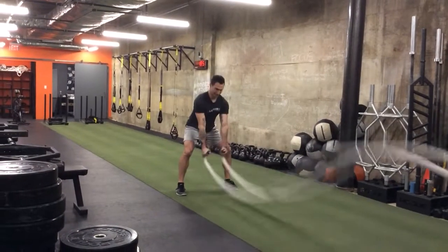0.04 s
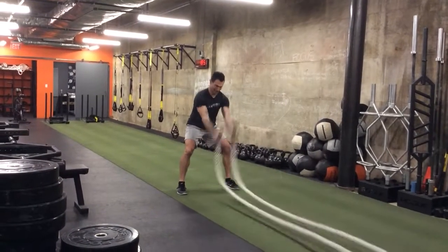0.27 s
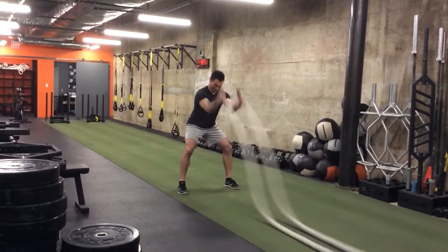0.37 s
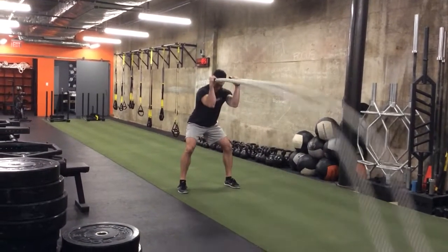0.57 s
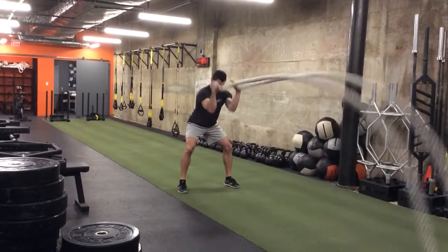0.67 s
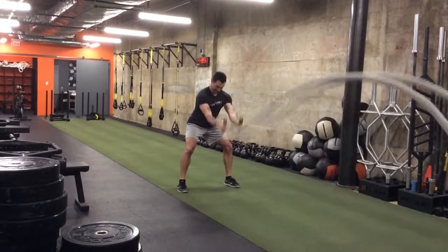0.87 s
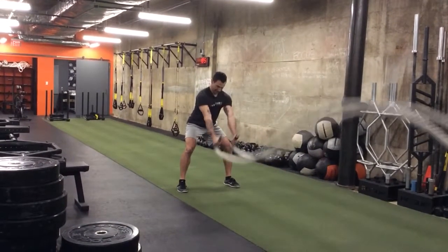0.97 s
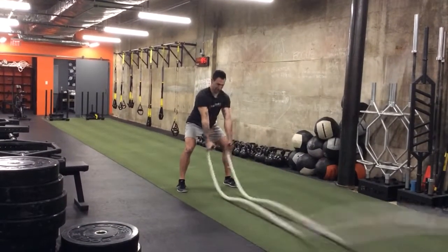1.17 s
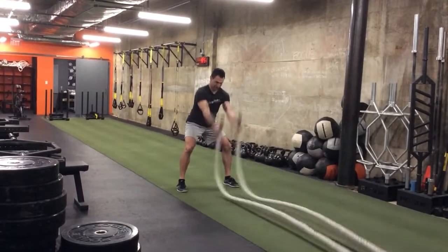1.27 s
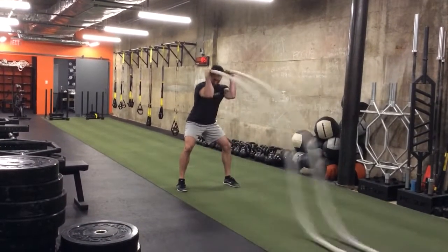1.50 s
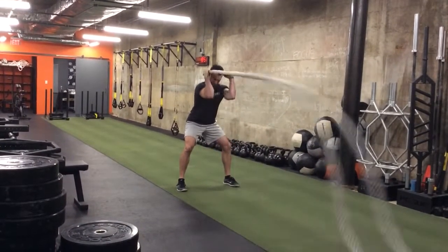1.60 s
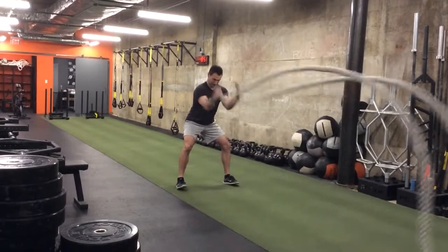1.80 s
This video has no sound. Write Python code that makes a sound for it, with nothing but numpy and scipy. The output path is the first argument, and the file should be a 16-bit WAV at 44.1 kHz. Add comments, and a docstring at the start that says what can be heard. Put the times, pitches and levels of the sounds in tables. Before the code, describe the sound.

Heavy ropes slam onto gym turf at about 0.2 seconds with a thud and quick slaps, then softer flops until 0.6. They swish through the air, strongest near 0.7, and fade. A second slam lands at about 1.25 seconds, followed by more flops, another swish near 1.6 and a soft dull thump at 1.8. The concrete hall rings briefly over a faint, steady low rumble.

```python
"""Two heavy battle ropes are slammed twice onto the turf of a concrete-walled gym.
Each slam is a thud and a fast run of slaps as the ropes lay themselves down; loops then flop onto
the floor. Between slams the braid swishes as the ropes are whipped up and over.
The hall rings, over a low rumble."""
import sys
import numpy as np
from scipy import signal
from scipy.fft import rfft, irfft
from scipy.io import wavfile

SR = 44100
rng = np.random.default_rng(int(sys.argv[2]) if len(sys.argv) > 2 else 0)


def inscribe(sig):
    """Save sig as 16-bit PCM at rate SR to the path in sys.argv[1].

    A 1-D sig is mono; a 2-D sig holds one channel per row.
    Samples are clipped to [-1, 1] before scaling.
    """
    pcm = np.round(np.clip(np.atleast_2d(sig).T, -1, 1) * 32767)
    wavfile.write(sys.argv[1], SR, pcm.astype(np.int16))


N = 81585

# Rope landings, two per slam: start_s, slap_db, lay_s, fade_db_per_s, smack_hz, scuff_db, body_db
LANDINGS = [(0.2071, -36.5, 0.016, 190, 388, -56, -39), (0.222, -36, 0.011, 119, 940, -50.5, -44),
            (1.2504, -38.5, 0.022, 198, 830, -51.5, -38), (1.282, -41, 0.066, 160, 610, -54, -40.5)]
# Scuffing braid: freq_hz, gain_db
SCUFF_SPECTRUM = [(300, -5), (1500, -13), (3500, 2), (5200, -3), (6800, -7), (8600, -3.5), (10500, -7.5),
                  (12500, -13.5), (15000, -13)]
FIBRES_PER_S = 9000


def undb(db):
    """Decibels to gain."""
    return 10 ** (np.asarray(db) / 20)


def unit(x):
    """Scale to rms 1."""
    return x / np.sqrt(np.mean(x ** 2) + 1e-18)


def colour(x, spectrum):
    """Minimum-phase filter of unit power through (freq_hz, gain_db) points."""
    size = 4096
    hz, db = np.array(spectrum).T
    bin_hz = np.arange(size // 2 + 1) * SR / size
    bin_db = np.interp(np.log(bin_hz + 1), np.log(hz), db)
    cepstrum = irfft(np.log(undb(bin_db)))
    cepstrum[1:size // 2] *= 2
    cepstrum[size // 2 + 1:] = 0
    response = irfft(np.exp(rfft(cepstrum)))
    return signal.fftconvolve(x, response / np.linalg.norm(response))[:N]


def contacts(per_s, scatter_db=0):
    """Tiny impacts at random times, rms 1."""
    chance, size = rng.random(N), rng.standard_normal(N)
    return unit((chance < per_s / SR) * rng.choice([-1, 1], N) * undb(scatter_db * size))


def envelope(age_s, hold_s, fade_db_per_s, attack_s=0.0069):
    """Linear rise, hold, exponential fade."""
    return np.clip(age_s / attack_s, 0, 1) * undb(-fade_db_per_s * np.maximum(age_s - hold_s, 0))


def hall(x, wet_db):
    """Add diffuse reflections from concrete; the treble dies sooner."""
    low_t60_s, treble_t60_s, split_hz, onset_s = 0.74, 0.63, 2100, 0.0053
    t, noise = np.arange(N) / SR, rng.standard_normal(N)
    low = signal.sosfilt(signal.butter(2, split_hz, fs=SR, output="sos"), noise)
    fall = -np.log(1000) * t
    tail = low * np.exp(fall / low_t60_s) + (noise - low) * np.exp(fall / treble_t60_s)
    tail *= np.clip(t / onset_s - .5, 0, 1)
    return x + undb(wet_db) * signal.fftconvolve(x, tail / np.linalg.norm(tail))[:N]


def rumble(level_db=-52.5):
    """Steady low background of the hall."""
    # Hall noise: freq_hz, gain_db
    rumble_spectrum = [(20, -27), (32, -14), (44, -2), (65, -2), (85, -5), (125, 0), (180, -2), (260, -11),
                       (400, -19), (800, -25), (1400, -30), (3000, -30), (7000, -49), (15000, -52)]
    return undb(level_db) * unit(colour(rng.standard_normal(N), rumble_spectrum))


def swish(t):
    """Fibres rub as the wave bends the ropes; their bulk pushes a low whoosh of air."""
    # Rubbing over the swings: time_s, level_db
    swing = [(0, -68.5), (0.08, -78.5), (0.14, -63), (0.19, -61.5), (0.30, -52), (0.41, -56.5), (0.48, -59),
             (0.59, -49.5), (0.67, -48), (0.80, -51.5), (0.96, -56.5), (1.04, -60.5), (1.13, -70.5),
             (1.22, -69), (1.38, -51.5), (1.50, -60.5), (1.58, -52), (1.69, -51.5), (1.78, -57.5),
             (1.85, -64.5)]
    # Rubbing fibres: freq_hz, gain_db
    fibre_spectrum = [(100, -17), (300, -16), (550, -18.5), (950, -9), (1400, -4.5), (2100, -0.5),
                      (2800, 0.5), (4000, -4), (5200, -11), (6800, -16.5), (8600, -12.5), (12000, -19.5),
                      (15000, -19)]
    # Pushed air: freq_hz, gain_db
    whoosh_spectrum = [(30, -21), (70, -5.5), (130, 4.5), (180, -2), (280, -6.5), (400, -16), (800, -25),
                       (4000, -62), (15000, -98)]
    # Rustle of braid leading into each slam: lead_s, width_s, level_db
    downstroke = (0.01, 0.058, -67)
    hiss_split_hz, hiss_db_per_db = 7000, 0.11
    whoosh_peak_db, whoosh_db_per_db = -51.5, 0.42
    swing_db = np.interp(t, *np.array(swing).T)
    effort_db = swing_db - swing_db.max()
    rub = undb(swing_db) * contacts(FIBRES_PER_S)
    dull = signal.sosfiltfilt(signal.butter(2, hiss_split_hz, fs=SR, output="sos"), rub)
    hiss = undb(hiss_db_per_db * effort_db) * (rub - dull)  # fast swings sound brighter
    fibres = colour(dull + hiss, fibre_spectrum)
    whoosh_db = whoosh_peak_db + whoosh_db_per_db * effort_db
    whoosh = colour(undb(whoosh_db) * rng.standard_normal(N), whoosh_spectrum)
    lead_s, width_s, rustle_db = downstroke
    pull = sum(np.exp(-((t - start_s + lead_s) / width_s) ** 2) for start_s, *_ in LANDINGS[::2])
    rustle = colour(undb(rustle_db) * pull * contacts(FIBRES_PER_S), SCUFF_SPECTRUM)
    return hall(fibres + rustle, wet_db=-20.5) + whoosh


def thuds(t):
    """Each falling loop gives the floor a soft push; a longer push sounds duller."""
    # Falling loops: start_s, impulse_db, contact_ms
    loop_falls = [(0.2045, -27, 3.15), (0.2102, -20, 0.6), (0.276, -35, 0.8), (0.3072, -24.5, 3.2),
                  (0.323, -21.5, 3.4), (0.3792, -28, 1.35), (0.384, -34, 2.63), (0.436, -34, 2.1),
                  (0.499, -31, 3.8), (0.552, -36.5, 2.3), (0.621, -41.5, 2.2), (0.954, -43, 2.7),
                  (1.2502, -25.5, 2.14), (1.2567, -28, 1.2), (1.3035, -30, 0.85), (1.350, -29, 1.05),
                  (1.371, -29, 1.6), (1.417, -28.5, 2.2), (1.433, -36, 1.5), (1.532, -37.5, 2.8),
                  (1.581, -36, 2.1), (1.591, -29, 3.9), (1.672, -41, 1.64), (1.796, -26, 9.2)]
    # Modes of rope and floor: freq_hz, gain_db, t60_s
    floor_modes = [(123.6, -33, 0.25), (155.6, -13.5, 0.29), (184.1, -10, 0.17), (227, -10.5, 0.096),
                   (302, -12.5, 0.083), (319, -10, 0.065), (380, -16.5, 0.069), (494, -17, 0.029),
                   (650, -20, 0.013)]
    low_cut_hz = 103  # a narrow rope radiates little deep bass
    push = np.zeros(N)
    for start_s, impulse_db, contact_ms in loop_falls:
        progress = np.clip((t - start_s) / (contact_ms / 1000), 0, 1)
        pulse = np.sin(np.pi * progress) ** 2
        push += undb(impulse_db) * pulse / (pulse.sum() + 1e-9)
    ring = sum(undb(gain_db) * np.sin(2 * np.pi * freq_hz * t) * np.exp(-np.log(1000) * t / t60_s)
               for freq_hz, gain_db, t60_s in floor_modes)
    ring = signal.sosfilt(signal.butter(2, low_cut_hz, "high", fs=SR, output="sos"), ring)
    return hall(signal.fftconvolve(push, ring)[:N], wet_db=-8)


def slams(t):
    """Contact runs along each rope: sharp slaps, a hollow smack, dull core blows, braid scuffing turf."""
    # Slaps: freq_hz, gain_db
    slap_spectrum = [(100, -38), (300, -2.5), (560, 1.5), (800, -3), (980, 1), (1300, -2), (1900, -6),
                     (2800, -6.5), (4000, -12), (5500, -20.5), (7000, -31), (15000, -35)]
    # Blows of the core: freq_hz, gain_db
    body_spectrum = [(40, -21.5), (100, -5), (180, 8), (280, 2), (400, 0.5), (500, 1.5), (570, -6),
                     (650, 5), (790, -10), (1200, -16), (3000, -17.5), (12000, -54)]
    smack_gain_db, scuff_rise_s = -6, 0.035
    slaps = body_gain = scuff_gain = 0
    for start_s, slap_db, lay_s, fade_db_per_s, smack_hz, scuff_db, body_db in LANDINGS:
        age_s = t - start_s
        hits = undb(slap_db) * envelope(age_s, lay_s, fade_db_per_s) * contacts(per_s=3400, scatter_db=2)
        smack = signal.lfilter(*signal.iirpeak(smack_hz, Q=3.5, fs=SR), hits)
        slaps = slaps + hits + undb(smack_gain_db) * smack
        body_shape = envelope(age_s, hold_s=max(0.014, lay_s), fade_db_per_s=98)
        body_gain = np.hypot(body_gain, undb(body_db) * body_shape)  # landings add in power
        swell = np.interp(age_s, [0, scuff_rise_s], [0.28, 1])
        scuff_shape = swell * envelope(age_s, hold_s=max(0.052, lay_s), fade_db_per_s=171)
        scuff_gain = np.hypot(scuff_gain, undb(scuff_db) * scuff_shape)
    body = colour(body_gain * contacts(per_s=700, scatter_db=4), body_spectrum)
    scuff = colour(scuff_gain * contacts(FIBRES_PER_S), SCUFF_SPECTRUM)
    return hall(colour(slaps, slap_spectrum) + body + scuff, wet_db=-11)


def scene():
    """Ropes and hall, mono."""
    t = np.arange(N) / SR
    return (slams(t) + thuds(t) + swish(t) + rumble())[None]


def record(dry):
    """Steep low-pass on the top treble."""
    cutoff_hz = 15300
    return signal.sosfilt(signal.ellip(12, .2, 70, cutoff_hz, fs=SR, output="sos"), dry)


dry = scene()
out = record(dry)
inscribe(out)
```